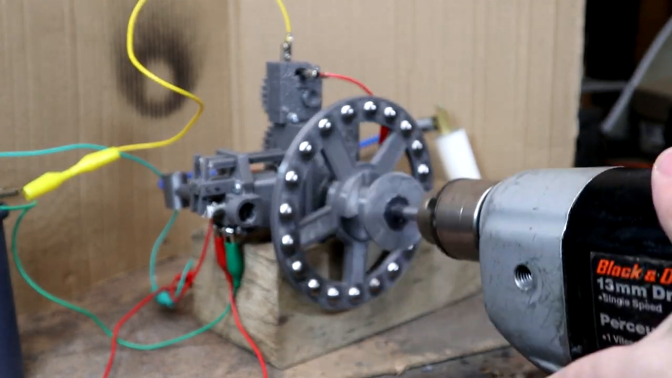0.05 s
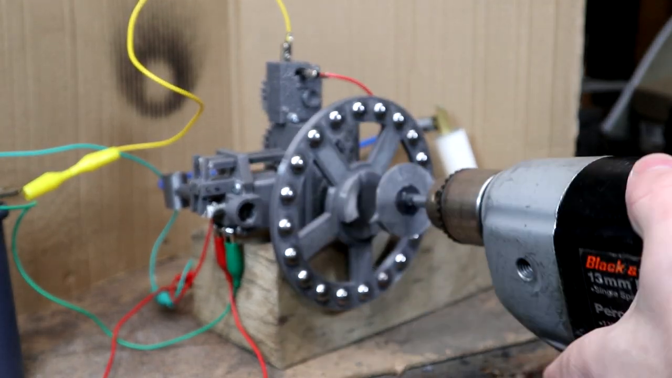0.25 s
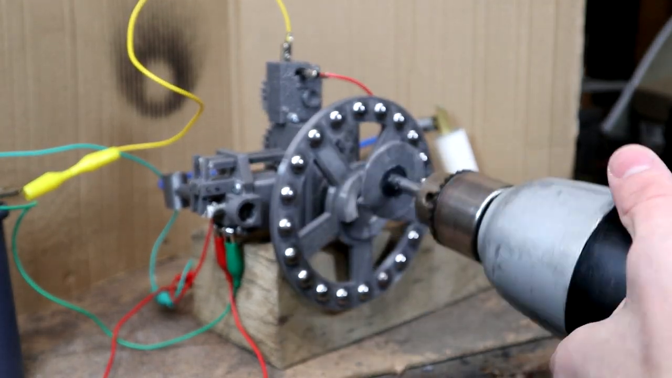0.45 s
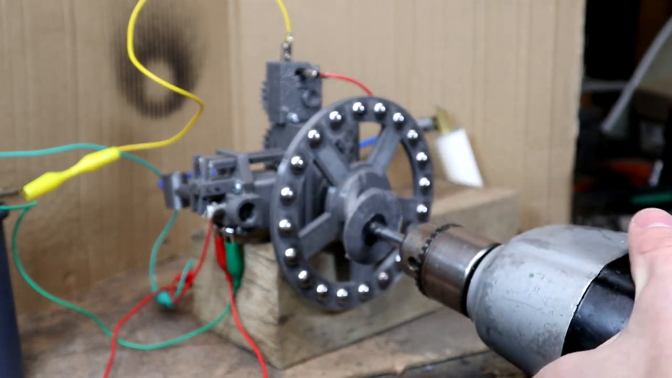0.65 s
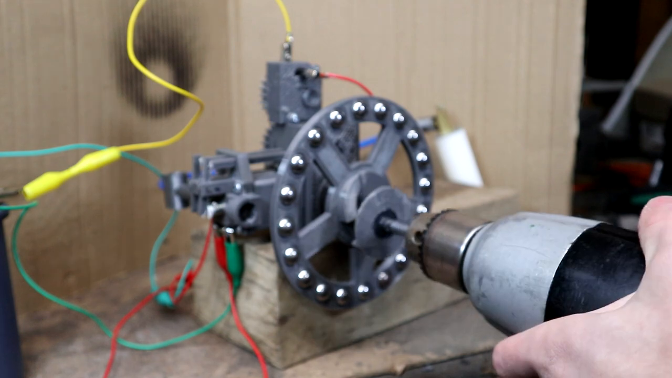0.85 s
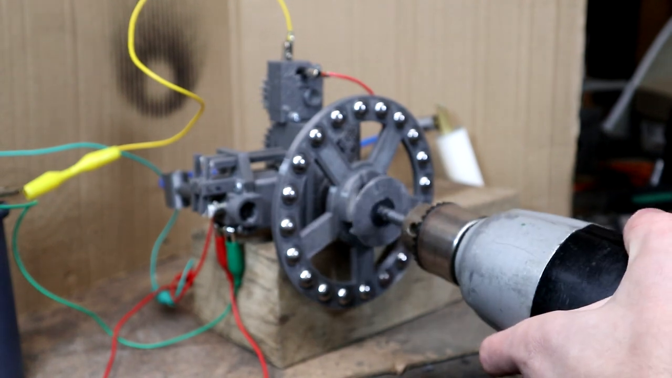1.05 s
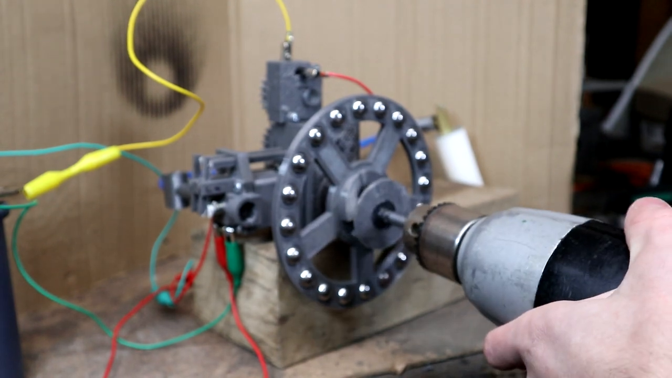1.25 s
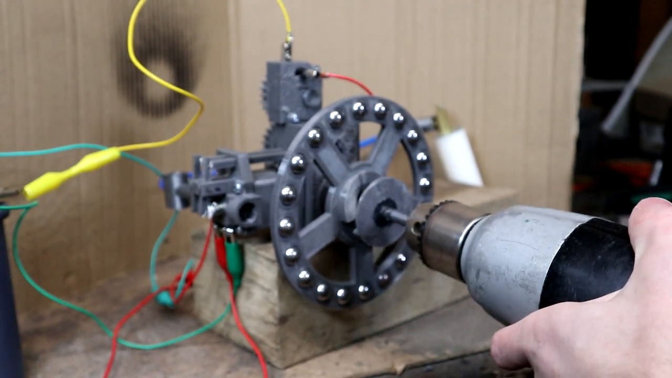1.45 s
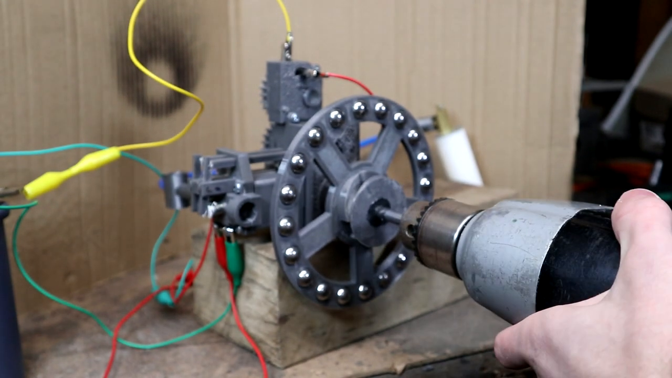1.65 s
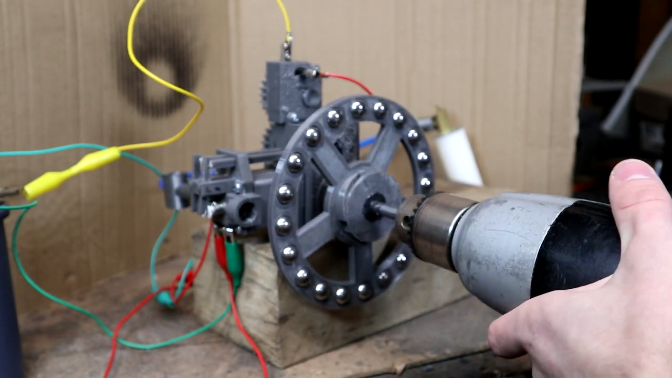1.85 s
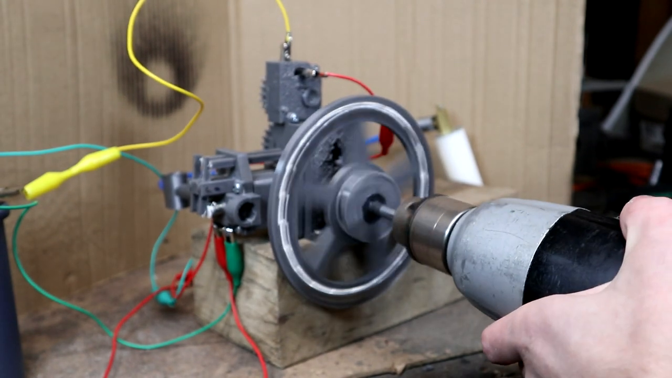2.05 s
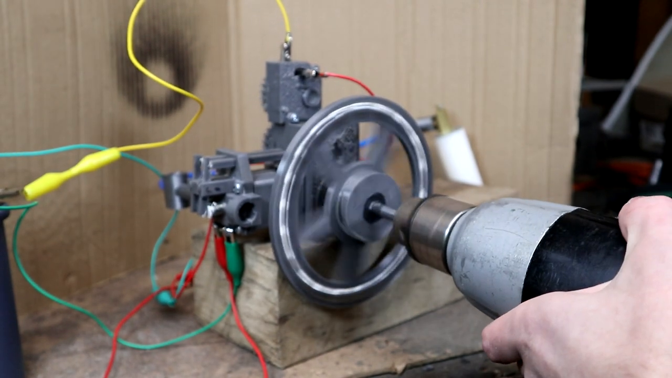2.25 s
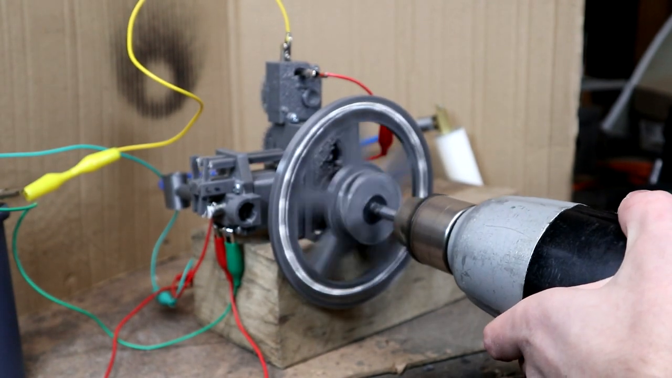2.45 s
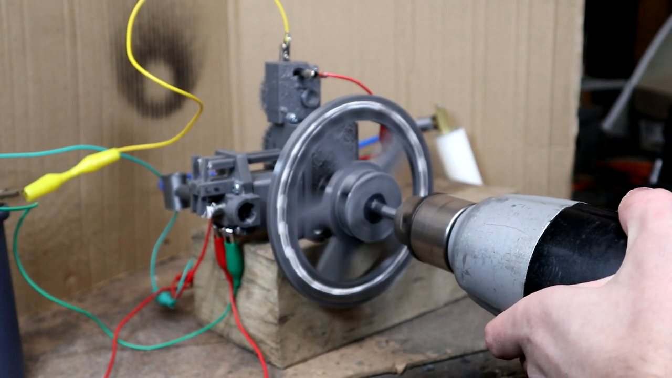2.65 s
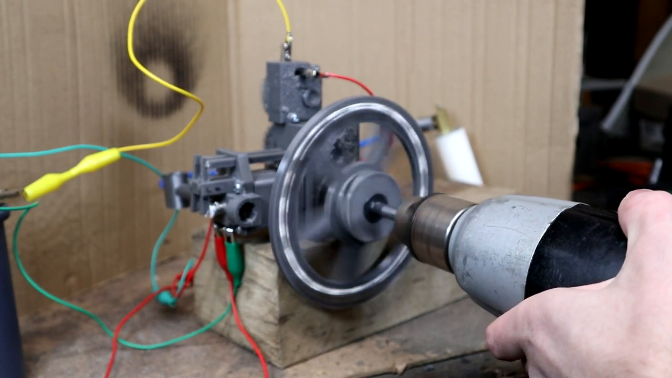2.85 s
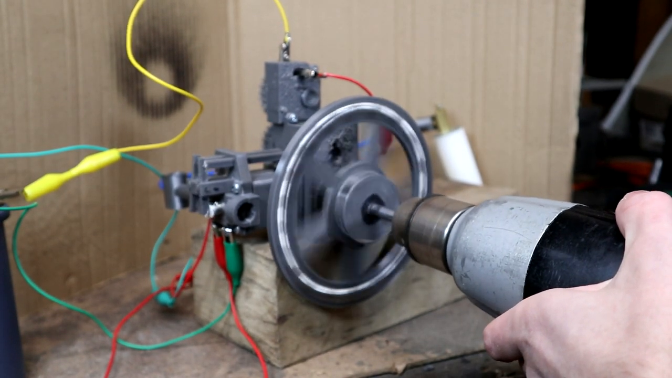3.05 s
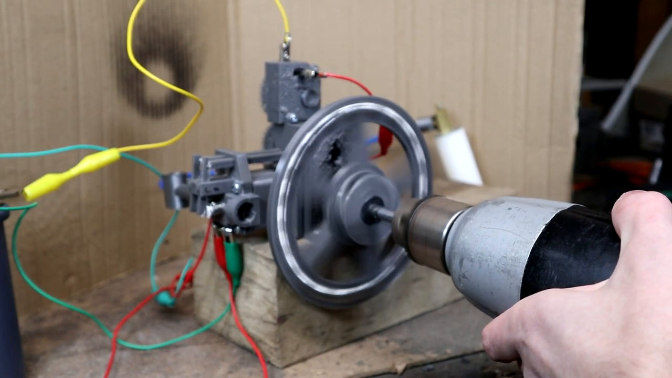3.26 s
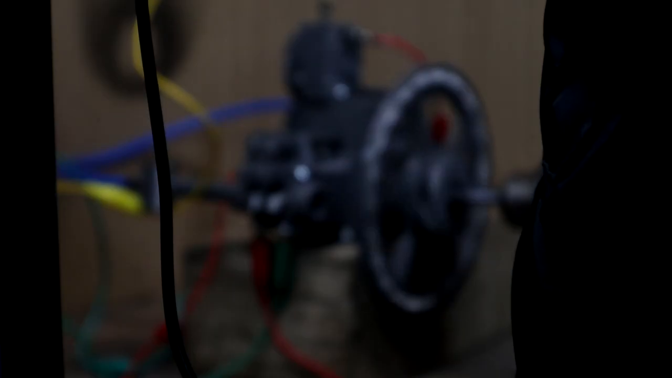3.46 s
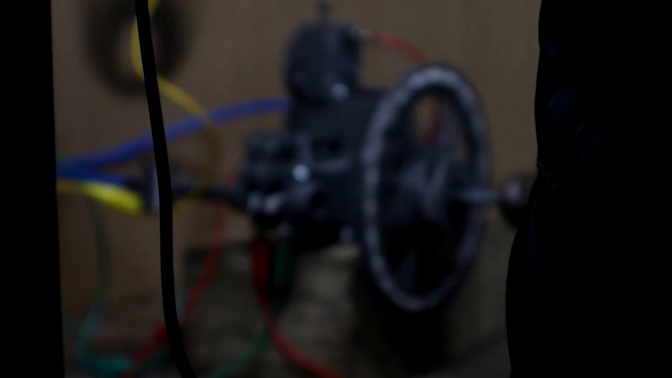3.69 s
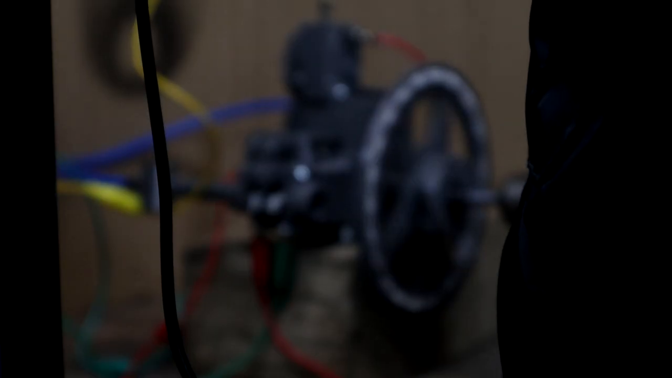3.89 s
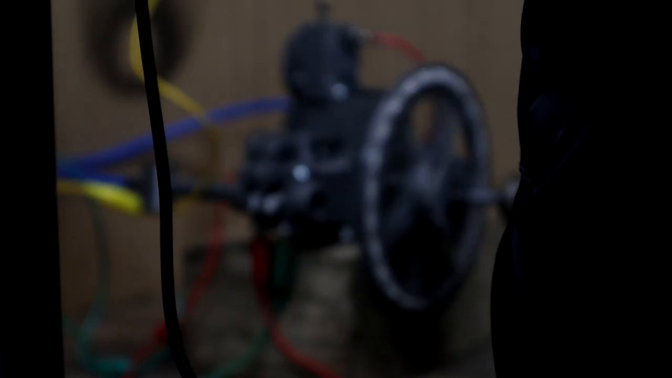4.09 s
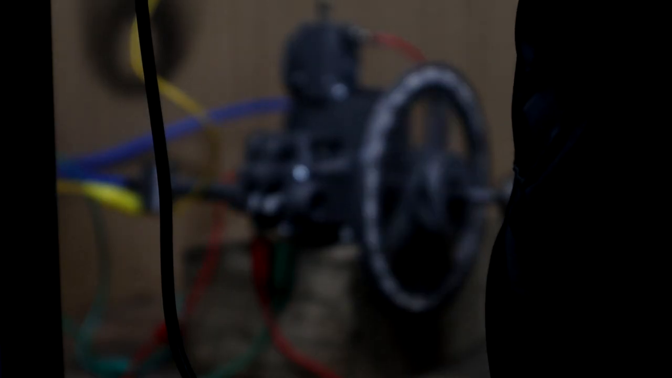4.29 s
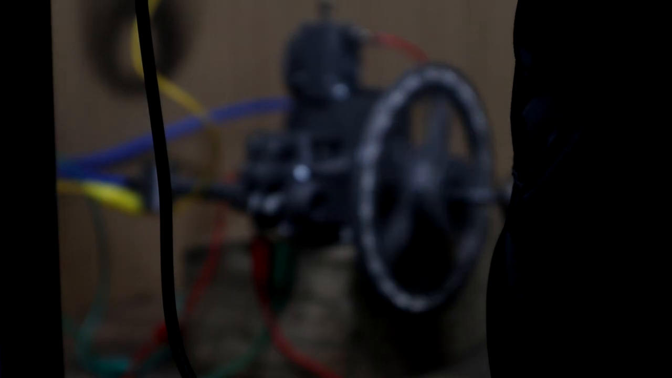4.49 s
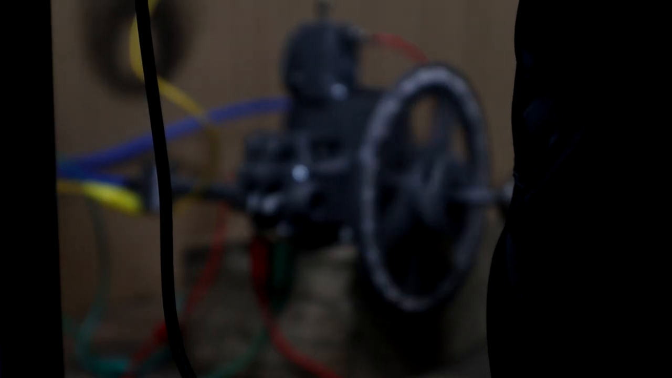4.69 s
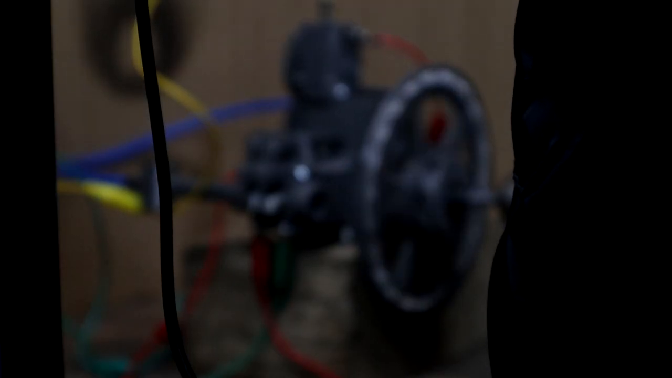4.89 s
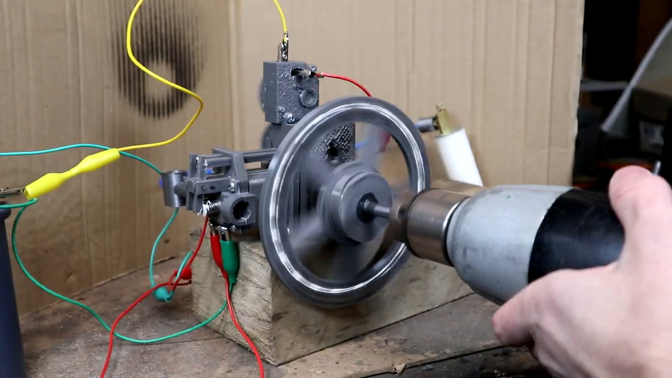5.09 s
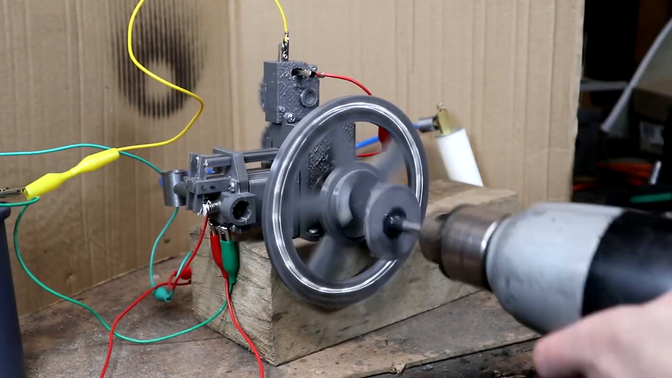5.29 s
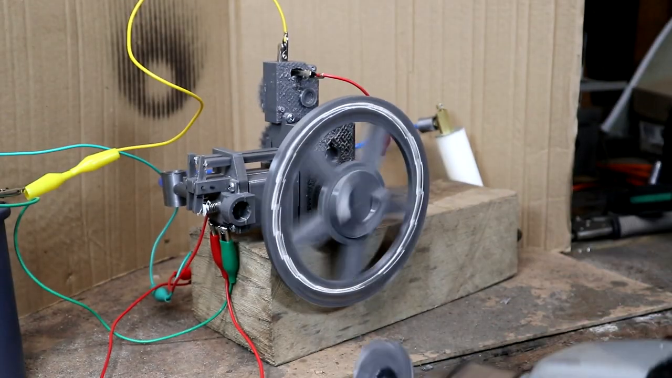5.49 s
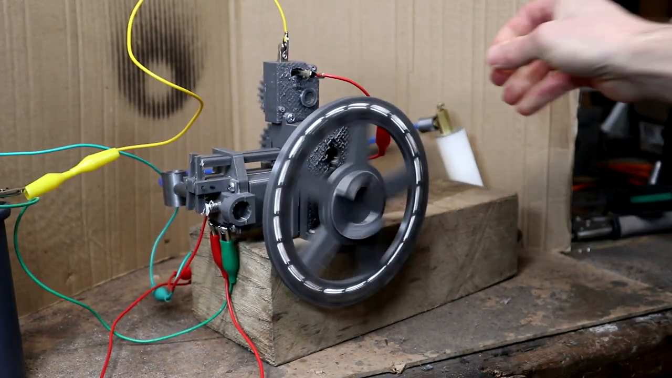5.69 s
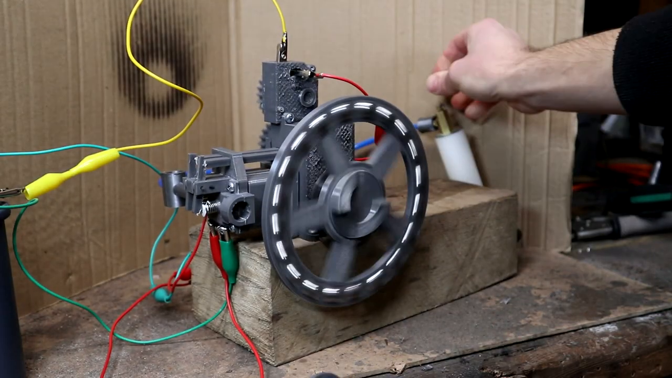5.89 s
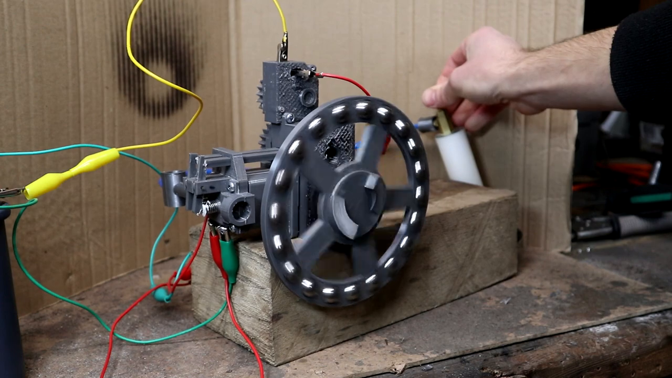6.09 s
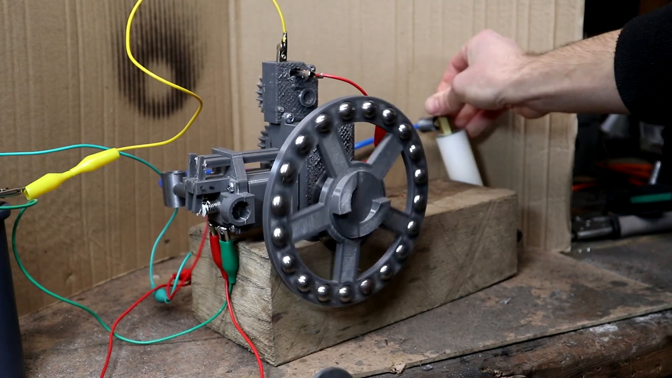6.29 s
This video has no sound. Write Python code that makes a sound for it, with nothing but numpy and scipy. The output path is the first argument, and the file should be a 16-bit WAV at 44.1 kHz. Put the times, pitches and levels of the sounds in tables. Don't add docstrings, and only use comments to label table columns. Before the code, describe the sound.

Close drill whine dies away, quiet hum and cloth rustle follow, then the drill revs a small flywheel hard, holds steady, and starts slowing.

```python
import sys
import numpy as np
from scipy import signal
from scipy.fft import rfft, irfft, next_fast_len
from scipy.io import wavfile
from scipy.ndimage import uniform_filter1d, map_coordinates

SR = 44100
rng = np.random.default_rng(int(sys.argv[2]) if len(sys.argv) > 2 else 0)


def level_to_linear(level):
    exponent = np.asarray(level, float) / 20
    return 10 ** exponent


def wav_record(signal):
    frames = np.transpose(np.atleast_2d(signal))
    bounded = np.clip(frames, -1, 1)
    quanta = np.round(bounded * 32767).astype(np.int16)
    wavfile.write(sys.argv[1], SR, quanta)


N = 279594
TRIGGER_S, RELEASE_S = 2.035, 5.354


def unit(x):
    return x / np.sqrt(np.mean(x ** 2) + 1e-20)


def along(points, hz):
    f, v = np.transpose(points)
    return np.interp(np.log(hz + 1), np.log(f + 1), v)


def curves(rows, t):
    s, *cols = np.transpose(rows)
    return [np.interp(t, s, c) for c in cols]


def wobble(rate, size):
    knots = rng.standard_normal(int(size * rate / SR) + 4)
    return map_coordinates(knots, [np.arange(size) * rate / SR])


def filtered(x, response):
    m = next_fast_len(x.shape[-1] + 8192)
    return irfft(rfft(x, m) * response(np.fft.rfftfreq(m, 1 / SR)), m)[..., :x.shape[-1]]


def narrow(centre, width):
    return unit(filtered(rng.standard_normal(N), lambda hz: 1 / (1 + (2 * (hz - centre) / width) ** 4)))


def lifts(modes, hz):
    return sum(db / (1 + (2 * (hz - c) / w) ** 2) for c, w, db in modes)


def room(x, wet_db, t60):
    t = np.arange(SR // 5) / SR
    tail = rng.standard_normal(len(t)) * level_to_linear(-60 * t / t60) * (t > .002)
    tail /= np.linalg.norm(tail)
    return x + level_to_linear(wet_db) * signal.fftconvolve(x, tail[None], axes=1)[:, :x.shape[1]]


def ports(direct, other, alike, lean, lag):
    def blend(hz):
        turn = np.arccos(np.clip(along(alike, hz), -1, 1)) / 2
        return np.array([np.cos(turn), np.sin(turn)])

    def offset(hz):
        shift = level_to_linear(along(lean, hz) / 2) * np.exp(-1j * np.pi * hz * lag / SR)
        return np.array([shift, 1 / shift])

    mid, side = filtered(np.array([direct, other]), blend)
    return filtered(np.array([mid + side, mid - side]), offset)


def coasting(start_hz, since):
    drag_s, friction_hz = 2.7, 472
    slowing = (start_hz + friction_hz) * np.exp(-np.maximum(since, 0) / drag_s)
    return np.maximum(slowing - friction_hz, 20)


CHANGES = [
    3.4355,
    5.0385,
]


def armature():
    t = np.arange(N) / SR
    full_hz, quick_s, slow_s, quick_share = 399.7, .062, .26, .48
    on = np.maximum(t - TRIGGER_S, 0)
    lag = quick_share * np.exp(-on / quick_s) + (1 - quick_share) * np.exp(-on / slow_s)
    up = np.maximum(full_hz * (1 - lag), 20)
    creep = 4 * np.exp(-np.abs(t - CHANGES[0]) / .2)
    hold = 399.9 - creep + 0.4 * wobble(9, N)
    stroke_hz, stroke_at_s, stroke_s = 2.4, 4.395, .222
    hold += stroke_hz * (((t - stroke_at_s) / stroke_s) % 1 - .5)
    down = coasting(405.7, t - RELEASE_S)
    return np.select([t < 1, t < CHANGES[0], t < CHANGES[1]], [coasting(208, t), up, hold], down)


def tones(turns, orders, blur, phase, flutter_db):
    size, total = len(turns), 0
    for order, db in orders:
        level = level_to_linear(db + flutter_db * (1 - wobble(28.29, size) ** 2))
        angle = order * (2 * np.pi * turns + blur * wobble(59.05, size))
        total = total + level * np.sin(angle + phase)
    return total * np.sqrt(2)


LOAD_FOLLOW = [3, -2, 0, 1.5, 1.5, 1, 0]
WHINE_FOLLOW = [0.21, 1, 0, 0.12, 0, 0.019, 0]
# (frequency [Hz], width [Hz], lift [dB])
HOUSING_PATH = [(1690, 220, 6), (1980, 70, -7), (2230, 160, 7), (2620, 250, 6), (2945, 30, -14),
                (3095, 14, -14), (3330, 250, 3), (4400, 150, -4)]
# (frequency [Hz], width [Hz], lift [dB])
PINION_OCTAVE_PATH = [(3250, 500, 12), (2680, 400, 12), (2200, 250, -14), (6350, 500, 6)]


def layer_levels(rows, mix, t, speed_hz):
    loud_db, load_db, whine_db = curves(rows, t)
    octaves = np.log2(speed_hz / speed_hz.max())
    db = []
    for base, slope, load, whine in zip(*mix, LOAD_FOLLOW, WHINE_FOLLOW):
        db.append(base + slope * octaves + loud_db + load * load_db + whine * whine_db)
    paths = (HOUSING_PATH, 8), (HOUSING_PATH, 12), (PINION_OCTAVE_PATH, 16)
    return [level + lifts(path, order * speed_hz) for level, (path, order) in zip(db, paths)] + db[3:]


# (armature order, level [dB])
PINION_TEETH = [(8, -1), (7, -12.5), (9, -13.5), (6, -30)]
# (armature order, level [dB])
FAN_BLADES = [(12, 0.71)]
# (armature order, level [dB])
PINION_OCTAVE = [(16, -1), (17, -12.5)]
# (armature order, level under the grind [dB])
UPPER_TEETH = [(24, -13.5), (32, -34)]
# (frequency [Hz], width [Hz], lift [dB])
GEARBOX_MODES = [(6350, 900, 16), (3900, 500, 16)]


def drill(speed_hz, levels, t, noise, case, phase, throb, blur, wet_db, upper_db=0, fan_flutter_db=3.4):
    pinion_db, fan_db, octave_db, *noise_db = levels
    turns = np.cumsum(speed_hz) / SR
    whine = level_to_linear(pinion_db) * tones(turns, PINION_TEETH, blur, phase, flutter_db=1.1)
    whine += level_to_linear(fan_db) * tones(turns, FAN_BLADES, blur, phase, fan_flutter_db)
    whine += level_to_linear(octave_db) * tones(turns, PINION_OCTAVE, blur, phase, flutter_db=0.0)
    upper = [(order, db + lifts(GEARBOX_MODES, order * speed_hz)) for order, db in UPPER_TEETH]
    whine += level_to_linear(noise_db[2] + upper_db) * tones(turns, upper, blur, phase, flutter_db=4)
    imbalance = (speed_hz / 400) ** 3 * np.sin(2 * np.pi * turns + phase)
    whine += level_to_linear(noise_db[0] - 14) * imbalance

    beat = 1 + throb * np.sin(2 * np.pi * turns)
    chatter = level_to_linear(0.72 * wobble(70.57, len(t)) + 1.08 * wobble(16.24, len(t)))
    raw = rng.standard_normal((4, len(t))) * [chatter, chatter, chatter * beat, beat]

    def bands(hz):
        below = [1 / (1 + (hz / edge) ** 8) for edge in (950, 1700, 5200)]
        under = np.array([0 * hz] + below + [1 + 0 * hz])
        return np.sqrt(np.abs(np.diff(under, axis=0))) * level_to_linear(along(noise, hz) + lifts(case, hz))

    layers = room(filtered(raw, bands), wet_db, t60=0.17)
    return whine + sum(level_to_linear(db) * unit(x) for db, x in zip(noise_db, layers))


# (frequency [Hz], width [Hz], lift [dB])
WALL_ECHO = [(4750, 900, 9.5), (3250, 400, 3.5)]


def heard(rows, mix, speed, start, stop, noise, case, alike, lean, lag, echo_db, **build):
    span = slice(round(start * SR), min(round(stop * SR), N))
    t = np.arange(N)[span] / SR
    speed_hz = speed[span]
    levels = layer_levels(rows, mix, t, speed_hz)
    aside = [levels[0], levels[1] - 12, *levels[2:]]
    direct = drill(speed_hz, levels, t, noise, case, phase=0, **build)
    scattered = drill(speed_hz, aside, t, noise, case, phase=np.pi / 2, **build)
    echo = tones(np.cumsum(speed_hz) / SR, FAN_BLADES, build['blur'], np.pi / 2, flutter_db=0.5)
    echo *= level_to_linear(echo_db + levels[-1] + lifts(WALL_ECHO, FAN_BLADES[0][0] * speed_hz))
    fade = np.clip(np.minimum(t - start, stop - t) / 0.0032, 0, 1)
    out = np.zeros((2, N))
    out[:, span] = (ports(direct, scattered, alike, lean, lag) + np.outer([1, -1], echo)) * fade
    return out


# (frequency [Hz], left-right likeness)
BENCH_ALIKE = [(30, 0.85), (100, 1), (1200, 0.95), (2500, 1), (5000, 0.21), (8000, 0.59), (12000, 0.78)]
# (frequency [Hz], left minus right [dB])
BENCH_LEAN = [(60, -4.5), (170, -2), (500, -1), (1430, -3), (4110, -3), (11800, -0.5)]
BENCH_MIC = dict(alike=BENCH_ALIKE, lean=BENCH_LEAN, lag=1.93, wet_db=-9)
# (time [s], loudness [dB], gear load [dB], whine [dB])
COAST_HAND = [
    (0, 1.5, -1, 3),
    (.15, -2, 0.5, -3.5),
    (.33, 1, -1.5, -3.5),
    (.38, -2.5, -2, -10),
    (.49, -0.5, -7.5, -7),
    (.585, -1.5, -13, -21),
    (.65, -20, -7.5, -9),
    (.78, -49.5, 0, -6),
]
# (level at top speed [dB] of each), (slope [dB per octave of speed] of each)
COAST_LAYERS = (-48.5, -69, -62.5, -49.5, -44.5, -41, -41.5), (13, 3.8, 10.5, 8.5, 5, 3.5, -0.4)
# (frequency [Hz], density [dB per Hz])
COAST_NOISE = [(100, -44.5), (150, -14), (555, -6.5), (680, -8), (850, -17), (1590, -11.5), (3320, -4),
               (4140, -9.5), (5770, -6.5), (10400, -6), (12300, -7), (13300, -21.5), (14500, -31),
               (17000, -120)]
# (frequency [Hz], width [Hz], lift [dB])
COAST_MODES = [(674, 39, 6.5), (2450, 180, 2)]


def first_coast(speed):
    return heard(COAST_HAND, COAST_LAYERS, speed, 0, .8, COAST_NOISE, COAST_MODES,
                 throb=0.15, blur=0.066, upper_db=-13.5, echo_db=-37, **BENCH_MIC)


# (frequency [Hz], density [dB per Hz])
RUMBLE_NOISE = [(20, -25), (45, -9), (70, -6.5), (100, -1), (160, -17), (230, -15), (400, -66.5)]
# (time [s], half length [s], rumble [dB])
BENCH_LEANING = [
    (.45, .1, -76),
    (1.2, .1, -77.5),
    (1.91, .04, -77),
]


def rumble(t):
    near_drill = (t > TRIGGER_S + .03) & ((t < CHANGES[0]) | (t > CHANGES[1]))
    shake_db = -67.5 - 21 * np.maximum(t - RELEASE_S, 0)
    level = level_to_linear(np.where(near_drill, shake_db, -89))
    level = level + sum(level_to_linear(db) * np.exp(-((t - s) / half) ** 2) for s, half, db in BENCH_LEANING)
    lumps = level_to_linear(4.4 * wobble(37, N))
    deep = unit(filtered(rng.standard_normal(N), lambda hz: level_to_linear(along(RUMBLE_NOISE, hz))))
    return level * unit(lumps * deep) + level_to_linear(-88) * narrow(203, 14) + level_to_linear(-83.5) * narrow(101, 8)


# (time [s], half length [s], rustle [dB], swish [dB])
SLEEVE_MOVES = [
    (.66, 0.052, -88, -88),
    (0.788, 0.064, -77.5, -79),
    (1.12, 0.059, -81.5, -101),
    (1.913, .03, -88, -110),
]
# (frequency [Hz], density [dB per Hz])
RUSTLE_NOISE = [(82, -43), (140, -5), (228, -12), (378, -10.5), (473, -16.5), (1450, -18), (3250, -25),
                (3920, -23), (5600, -30), (12300, -35), (16000, -64.5), (22000, -120)]
STILL_SLEEVE = -84.5, -104


def sleeve(t):
    moves = sum(level_to_linear(db)[:, None] * np.exp(-((t - s) / half) ** 2) for s, half, *db in SLEEVE_MOVES)
    rustling, swishing = level_to_linear(STILL_SLEEVE)[:, None] + moves
    rustle = unit(filtered(rng.standard_normal(N), lambda hz: level_to_linear(along(RUSTLE_NOISE, hz))))
    swish = narrow(3600, 1300) + level_to_linear(-0.5) * narrow(6800, 3000)
    return rustling * level_to_linear(1.5 * wobble(41, N)) * rustle + swishing * swish


# (time [s], level [dB])
BALLAST_HUM = [(0, -59.5), (.35, -56.5), (.65, -65), (1.05, -70), (1.6, -76.5), (2, -72), (3.42, -77),
               (3.45, -66.5), (5.02, -66.5), (5.06, -70), (5.82, -69), (5.92, -63)]


def shop():
    t = np.arange(N) / SR
    hum_db, = curves(BALLAST_HUM, t)
    hum = level_to_linear(hum_db + 6.0 + .6 * wobble(11, N)) * np.sin(2 * np.pi * 120.1 * t)
    deep = hum + rumble(t)
    whistling = level_to_linear(hum_db - 19.0 - 60 * np.maximum(0.59 - t, 0))
    left, right = (sleeve(t) + whistling * narrow(3990, 110) for _ in range(2))
    return ports(deep + left, level_to_linear(-11) * deep + right, [(100, 0.8), (1000, 0.18), (5000, 0.16)], [(100, .3)], 0)


CHUCK_TONE = -45, 150, 200
# (time [s], hold [s], level [dB], fall [dB/s])
FREE_CASING = [
    (0.417, .05, -58, 153),
    (.57, 0.036, -79, 499),
    (5.618, 0.29, -40.5, 63),
]


def chuck_gear(speed):
    t = np.arange(N) / SR
    peak_db, rise, fall = CHUCK_TONE
    since = t - .275
    level = level_to_linear(peak_db - np.maximum(-rise * since, fall * since))
    gear = level * np.sin(2 * np.pi * 4.85 * np.cumsum(speed) / SR)
    swell = 0
    for s, hold, db, fall in FREE_CASING:
        before, after = np.maximum(s - t, 0), np.maximum(t - s - hold, 0)
        swell = swell + level_to_linear(db - 440 * before - fall * after)
    return gear + swell * level_to_linear(1.1 * wobble(18, N)) * narrow(695, 80)


# (time [s], peak [dB], ring [Hz], t60 [s])
TOUCHES = [
    (0.322, -37, 4800, 0.045),
    (.622, -51, 3600, 0.034),
    (1.209, -65, 1030, 0.1),
    (1.24, -70.5, 1110, .12),
    (1.378, -59, 1960, 0.04),
    (1.422, -68, 2100, 0.046),
    (1.431, -65, 2100, 0.064),
    (1.535, -71, 2300, .03),
    (1.615, -74, 2200, 0.03),
    (1.615, -78, 3120, .03),
]
# (time [s], peak [dB], pitch [Hz], t60 [s])
THUDS = [(.32, -49.5, 126, 0.22), (.585, -60, 442, 0.089), (1.895, -47, 183, 0.042),
         (2.072, -40, 119, 0.065), (2.205, -56, 198, 0.061), (2.58, -45, 120, 0.073),
         (2.93, -42, 180, 0.066), (3.075, -46, 130.2, 0.075), (3.155, -41, 160, 0.057),
         (3.375, -49, 198.8, 0.055), (5.359, -42, 206, 0.077)]


def handling():
    x, t = np.zeros(N + SR), np.arange(SR // 4) / SR
    for s, db, hz, t60 in TOUCHES:
        ring = lambda f: 1 / (1 + ((f - hz) / (.13 * hz)) ** 4)
        scrape = unit(filtered(rng.standard_normal(len(t)), ring))
        scrape *= level_to_linear(-2.5 - 60 * t / t60) * (1 - np.exp(-t / 0.0012))
        click = uniform_filter1d(uniform_filter1d(rng.standard_normal(len(t)), size=6), size=5)
        tick = level_to_linear(-7 - 60 * t / 0.0084) * unit(click)
        x[round(s * SR):][:len(t)] += level_to_linear(db) * (scrape + tick)
    for s, db, hz, t60 in THUDS:
        thud = np.sin(2 * np.pi * hz * t) * (1 - np.exp(-t / 0.0048))
        x[round(s * SR):][:len(t)] += level_to_linear(db - 60 * t / t60) * thud
    return ports(x[:N], np.roll(x[:N], 40), BENCH_ALIKE, BENCH_LEAN, 1.9)


# (time [s], loudness [dB], gear load [dB], whine [dB])
RUN_UP_HAND = [
    (2.03, -44, -2, -25),
    (2.055, -14.5, 5.5, -19),
    (2.085, -5, 1.5, 2.5),
    (2.13, -3, 2, 2),
    (2.22, 1, 1, -1),
    (2.4, 0, -0.1, 4),
    (2.75, 0, 0.4, 2),
    (3.05, -1.5, 0, 0.5),
    (3.43, -0.5, 0, 0.7),
]
# (level at top speed [dB] of each), (slope [dB per octave] of each)
RUN_UP_LAYERS = (-36.5, -39, -49.5, -40.5, -36, -34, -36.5), (7.5, -2, 18, 0, 5.5, 0.5, 1)
# (frequency [Hz], density [dB per Hz])
BENCH_NOISE = [(40, -52), (104, -23), (292, -16.5), (390, -8), (710, -5), (1120, -13), (2650, -5.5),
               (4390, -11), (6590, -8.5), (8580, -9.5), (11000, -8.5), (12300, -24.5), (13300, -21.5),
               (14500, -38.5), (17000, -120)]
# (frequency [Hz], width [Hz], lift [dB])
BENCH_MODES = [(555, 190, 3.5), (747, 42, 6), (1070, 98, 6), (1277, 270, 7.5), (2430, 130, 0.5),
               (3060, 240, 3)]


def run_up(speed):
    return heard(RUN_UP_HAND, RUN_UP_LAYERS, speed, 2.02, CHANGES[0], BENCH_NOISE, BENCH_MODES,
                 throb=0.22, blur=0.086, upper_db=-10, echo_db=-9, **BENCH_MIC)


# (time [s], loudness [dB], gear load [dB], whine [dB])
HOLD_HAND = [
    (3.44, 0.013, 0.12, -10),
    (3.56, 0, -0.061, -5),
    (3.84, 0, -0.17, 0),
    (4.3, 0, -0.28, 2),
    (4.41, 0, -0.87, -2.5),
    (4.5, 0, -0.28, -0.5),
    (4.76, 0, 0.0055, 2),
    (4.84, 0, 0.11, -2),
    (4.93, 0, -0.28, 2),
]
# (level at top speed [dB] of each), (slope [dB per octave] of each)
HOLD_LAYERS = (-59, -42, -82, -47.5, -48, -43, -48.5), (0, 0, 0, 0, 0, 2, 6)
# (frequency [Hz], density [dB per Hz])
DISTANT_NOISE = [(40, -27), (112, -17.5), (322, -10.5), (400, -6.5), (840, 3.5), (950, -0.5), (1810, -8),
                 (4390, -11.5), (6000, -7), (9900, -13.5), (12450, -15.5), (12800, -46), (14100, -19),
                 (17000, -120)]
# (frequency [Hz], width [Hz], lift [dB])
DISTANT_MODES = [(640, 120, 4.6), (837, 68, 2.9), (1064, 92, 4.6), (1298, 58, 5.5), (1600, 80, 7.8),
                 (1843, 160, 7.9), (2404, 35, 8.4), (6870, 65, 6)]
# (frequency [Hz], left-right likeness)
DISTANT_ALIKE = [(60, 0.78), (270, 1.0), (580, 1), (1230, 0.95), (2620, 0.92), (4500, 0.51), (5200, 0.29),
                 (11800, -0.28)]
# (frequency [Hz], left minus right [dB])
DISTANT_LEAN = [(60, -6), (170, 2.5), (500, 0.6), (1430, -2), (4110, 2.5), (11800, -0.7)]


def steady_run(speed):
    return heard(HOLD_HAND, HOLD_LAYERS, speed, *CHANGES, DISTANT_NOISE, DISTANT_MODES, DISTANT_ALIKE,
                 DISTANT_LEAN, lag=0, throb=0.24, blur=0.012, fan_flutter_db=1.75, upper_db=-18,
                 echo_db=-20.5, wet_db=-8)


# (time [s], loudness [dB], gear load [dB], whine [dB])
LAST_COAST_HAND = [
    (5.04, -0.068, .6, -11),
    (5.1, 0, 1, -4),
    (5.12, -0.29, 0, 1),
    (5.35, -0.13, 0.0071, 4.5),
    (5.47, -1.5, .3, 0),
    (5.75, -0.04, 1, 0.5),
    (5.9, -0.6, 1, -2.5),
    (6.34, 0.14, 0, -7.5),
]
# (level at top speed [dB] of each), (slope [dB per octave] of each)
LAST_COAST_LAYERS = (-40, -36.5, -60.5, -40.5, -35, -33.5, -37), (5, 9.5, -6, 1.5, 17.5, 5, 6)
# (frequency [Hz], width [Hz], lift [dB])
LAST_COAST_MODES = [(572, 150, 6.3), (736, 94, 2.25), (1065, 110, 5), (1284, 260, 8), (2300, 43, 2.4),
                    (2610, 200, 3.1)]


def last_coast(speed):
    return heard(LAST_COAST_HAND, LAST_COAST_LAYERS, speed, CHANGES[1], 6.4, BENCH_NOISE, LAST_COAST_MODES,
                 throb=0.18, blur=0.059, upper_db=-9.5, echo_db=-13.5, **BENCH_MIC)


def scene():
    speed = armature()
    mix = first_coast(speed) + shop() + chuck_gear(speed) + handling()
    return mix + run_up(speed) + steady_run(speed) + last_coast(speed)


def low_pass(x):
    return signal.sosfilt(signal.butter(12, 14500, fs=SR, output="sos"), x)


def record(dry):
    return low_pass(dry)


dry = scene()
out = record(dry)
wav_record(out)
```